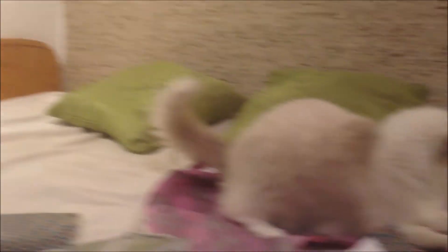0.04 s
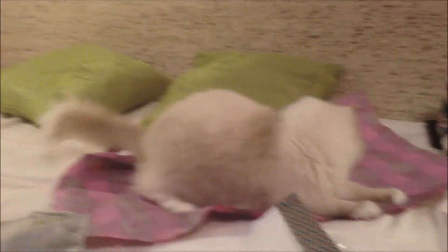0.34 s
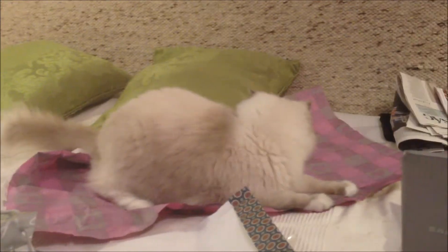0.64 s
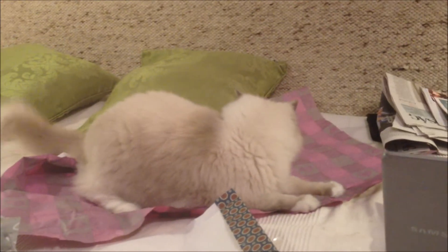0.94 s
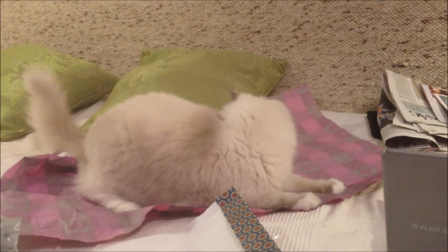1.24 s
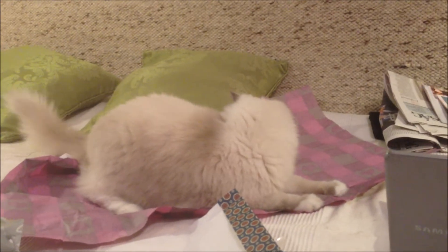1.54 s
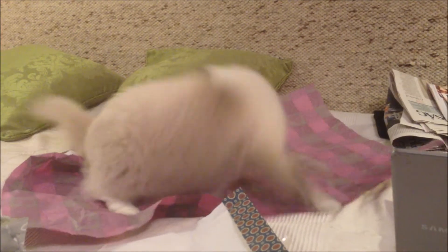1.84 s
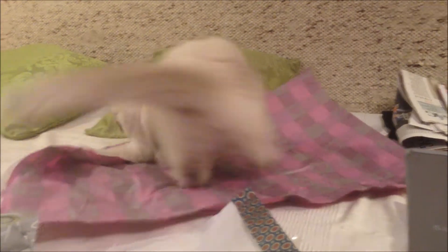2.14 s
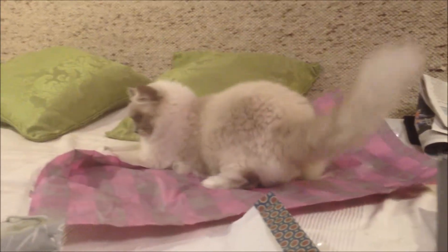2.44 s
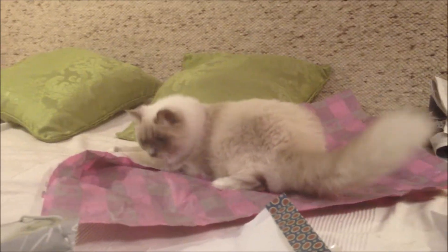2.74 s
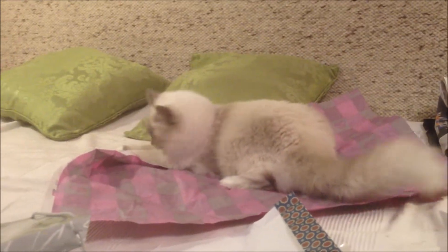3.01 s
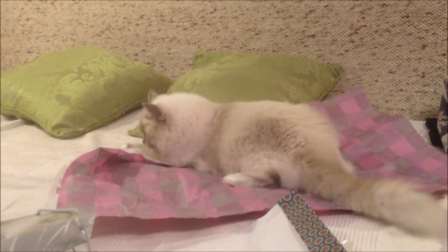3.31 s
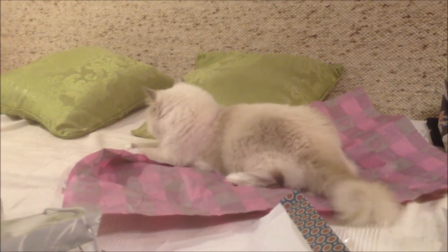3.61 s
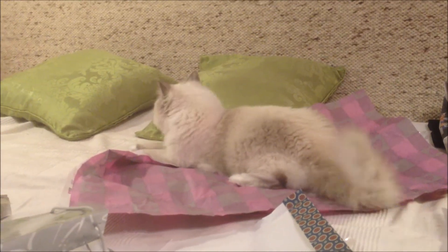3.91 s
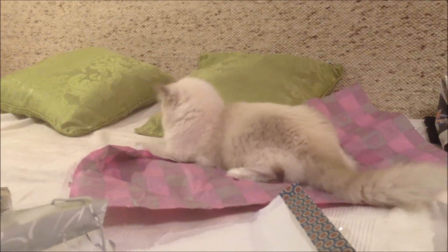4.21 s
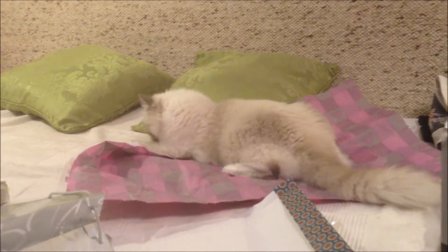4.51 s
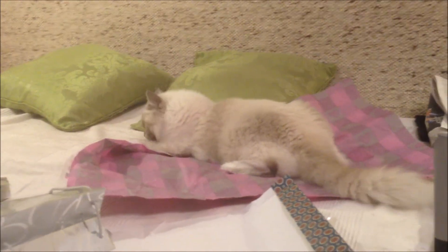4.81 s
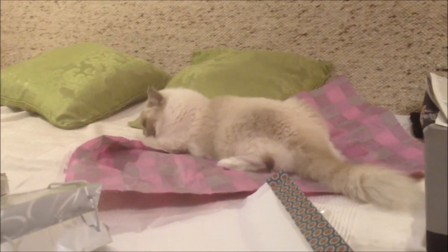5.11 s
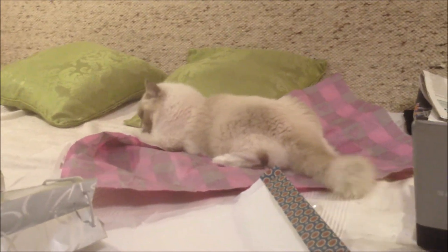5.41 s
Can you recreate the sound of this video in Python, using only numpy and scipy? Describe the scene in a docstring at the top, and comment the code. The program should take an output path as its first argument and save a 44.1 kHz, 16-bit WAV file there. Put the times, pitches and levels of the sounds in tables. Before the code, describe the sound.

A cat pounces and paws on crinkly wrapping paper on a bed, with one loud rustle among lighter crackles and sharp snaps.

```python
"""A small, quiet bedroom, one microphone close to a bed spread with a sheet of wrapping paper.
A cat shifts on the sheet, whirls round in a pounce, then paws at it. Creases buckle in swarms of tiny
clicks that ring small facets, single folds snap through, and the whole sheet flaps. A soft, breathy hiss
opens the scene and returns twice, fainter. A claw drags twice, a paw thuds once on the mattress, and
the near walls answer the paper."""
import sys
import numpy as np
from scipy import signal
from scipy.fft import rfft, irfft
from scipy.io import wavfile

SR = 44100
rng = np.random.default_rng(int(sys.argv[2]) if len(sys.argv) > 2 else 0)


def log_audio(samples):
    """Write samples as a 16-bit WAV file to the path given in sys.argv[1]."""
    # one column per channel
    frames = np.atleast_2d(samples).T
    # limit to full scale, then quantise
    limited = np.clip(frames, -1, 1)
    pcm = np.round(limited * 32767).astype(np.int16)
    wavfile.write(sys.argv[1], SR, pcm)


N = 244755
TIME = np.arange(N) / SR
ATTACK_S, RELAX_DB_PER_S = 0.0043, 182  # a push builds up, then the sheet relaxes
REFERENCE_DB = -47.5  # the push against which flapping and lesser folds are scaled

# the main folds snapping through:
# (time [s], crack level [dB], panel level [dB], crack pitch [Hz], panel pitch [Hz])
MAIN_FOLDS = [(0.1422, -43.5, -52, 12100, 4500), (0.173, -55, -45.5, 9000, 4030),
              (0.2264, -47, -47.5, 9000, 3980), (.3006, -51, -47, 9200, 900),
              (0.4262, -44, -48.5, 12300, 900), (0.4552, -36.5, -46.5, 10600, 4200),
              (0.636, -68, -54, 9000, 1200), (.812, -44.5, -52.5, 10000, 3780),
              (0.978, -53.5, -52.5, 8700, 900), (1.0587, -51.5, -55, 8800, 2620),
              (1.532, -55, -53.5, 9400, 890), (1.5425, -42.5, -53, 10100, 4240),
              (1.7353, -42, -40.5, 11000, 3500), (1.7437, -36, -37, 10000, 3900),
              (2.5044, -39, -60, 9900, 3900), (2.6467, -38, -47, 9100, 3800),
              (2.7132, -27.5, -38, 10700, 3560), (3.0401, -48, -49.5, 8000, 1800),
              (3.078, -43, -51, 11700, 5530), (3.2233, -39, -46, 11000, 4100),
              (3.3547, -55, -52.5, 7400, 4130), (3.4707, -47, -52, 10500, 4070),
              (3.5269, -39.5, -48, 10500, 4770), (3.8494, -59.5, -57.5, 10900, 4700),
              (3.954, -53, -44, 10000, 2630), (4.1629, -40, -50, 9700, 2520),
              (4.3688, -54.5, -53.5, 12500, 900), (4.4666, -50, -54.5, 9200, 4900),
              (4.4823, -50, -68, 7400, 4600), (4.714, -47.5, -59, 9200, 2070),
              (5.0516, -72, -48, 8500, 1890), (5.128, -43, -47, 11200, 4200),
              (5.1435, -42, -51, 9400, 5400), (5.2057, -36.5, -39, 11000, 3300)]


def undb(db):
    """Decibels to gain."""
    return 10 ** (np.asarray(db) / 20)


def unit(x):
    """Scale to an rms of one."""
    return x / np.sqrt(np.mean(x ** 2) + 1e-20)


def convolve(x, response):
    """Filter by an impulse response, keeping the length."""
    return signal.oaconvolve(x, response)[:len(x)]


def add(out, when, x):
    """Mix a short sound in at a time in seconds."""
    i = max(int(when * SR), 0)
    out[i:i + len(x)] += x[:max(len(out) - i, 0)]


def colour(points, size=2048):
    """Minimum-phase response of unit energy, shaped by (frequency [Hz], relative level [dB]) points."""
    hz, db = np.transpose(points)
    log_hz = np.log(np.fft.rfftfreq(size, 1 / SR) + 1)
    gain = undb(np.interp(log_hz, np.log(hz), db))
    cepstrum = irfft(np.log(gain))
    cepstrum[1:size // 2] *= 2
    cepstrum[size // 2 + 1:] = 0
    return unit(irfft(np.exp(rfft(cepstrum)))) / np.sqrt(size)


def resonate(x, hz, width_hz):
    """Two-pole resonance, gain one at its centre."""
    hz = min(hz, .45 * SR)
    return signal.lfilter(*signal.iirpeak(hz, hz / width_hz, fs=SR), x)


def swell(start, end, fall_db_per_s=RELAX_DB_PER_S, attack_s=ATTACK_S):
    """Envelope that rises, holds until the end and dies away."""
    return np.clip((TIME - start) / attack_s, 0, 1) * undb(-fall_db_per_s * np.maximum(TIME - end, 0))


def buckles(per_s, spread_db):
    """Random impulses of unit mean power: many small, a few large."""
    chance = np.minimum(per_s / SR, 1)
    sizes = unit(undb(spread_db * np.minimum(rng.exponential(size=N), 3.5)))
    return (rng.random(N) < chance) * rng.choice([-1, 1], N) * sizes / np.sqrt(chance)


def burst(envelope):
    """A click smeared over an envelope, as bending waves of different pitch travel at different speeds."""
    spectrum = rfft(rng.standard_normal(len(envelope)) * envelope)
    flat_noise = irfft(spectrum / np.abs(spectrum), len(envelope))
    return flat_noise * np.sqrt(envelope / envelope.max())


def room_tone(level_db=-65.5):
    """Steady low room noise under a faint hiss."""
    # spectrum of the still room: (frequency [Hz], relative level [dB])
    spectrum = [(25, -46), (60, -20), (110, -5.5), (170, -2), (230, 1.5), (330, -6), (580, -7.5),
                (850, -9.5), (2200, -11.5), (5000, -14), (10000, -20.5), (15500, -16)]
    return undb(level_db) * convolve(rng.standard_normal(N), colour(spectrum))


def bedroom(direct):
    """At the microphone: direct sound, two scattered echoes and a short tail that loses treble first."""
    # first echoes off the bed and the near walls: (delay [s], spread [s], level [dB])
    echoes = [(.005, 0.0033, -25), (.017, 0.0017, -20)]
    t = TIME[:SR // 2]
    response = np.zeros(len(t))
    for delay, spread, db in echoes:
        window = np.exp(-((t - delay - spread / 2) / (spread / 2)) ** 2 / 2)
        response += undb(db) * unit(rng.standard_normal(len(t)) * window)
    build_up = np.clip((t - .012) / 0.0064, 0, 1)
    for band, t60_s, db in (("low", 0.55, -5), ("high", .4, -9.5)):
        tail = unit(rng.standard_normal(len(t)) * build_up * undb(-60 * t / t60_s))
        response += undb(db) * signal.sosfilt(signal.butter(2, 5500, band, fs=SR, output="sos"), tail)
    return direct + convolve(direct, response / np.sqrt(len(t)))


def pawfall(when=2.768, level_db=-43.5, hz=225, length_s=0.014):
    """The mattress gives under a paw and springs back: a soft thud of about three swings."""
    out, t = np.zeros(N), TIME[:2048]
    press = np.sin(np.pi * np.minimum(t / length_s, 1)) ** 2
    add(out, when, undb(level_db) * press * np.sin(2 * np.pi * hz * t))
    return out


def hiss_strength(fade_db_per_s=31.5):
    """Envelope of the breathy hiss: each spell holds steady, fades and stops."""
    # spells of hiss: (start [s], fades [s], stops [s], strength [dB])
    spells = [(0, 0.454, 0.726, -54.5), (3.974, 4.25, 4.4, -63), (5.024, 5.28, 5.38, -66)]
    return sum(undb(db - fade_db_per_s * np.maximum(TIME - fades, 0))
               * swell(start, stops, fall_db_per_s=260) for start, fades, stops, db in spells)


def breathy_hiss(strength):
    """A soft, breathy, fine-grained hiss with hollow, vowel-like resonances."""
    # spectrum of the hiss: (frequency [Hz], relative level [dB])
    spectrum = [(80, -16), (200, 3.5), (700, 0), (3200, -4.5), (5600, -3), (8000, -2), (13000, -3),
                (15500, -10.5)]
    # vowel-like resonances: (frequency [Hz], width [Hz], gain [dB])
    peaks = [(274, 87, 4.7), (440, 55, 6.8), (1243, 94, 8.1), (4000, 270, 1.4), (4670, 380, 2.4)]
    grain = buckles(per_s=6000, spread_db=1)
    ring = sum(undb(db) * resonate(rng.standard_normal(N), hz, width) for hz, width, db in peaks)
    return convolve(strength * (grain + ring), colour(spectrum))


def claw_scratches(hz=4000, width_hz=630):
    """A claw catches and slips in quick succession, ringing one stiff panel."""
    # drags of the claw: (start [s], length [s], level [dB])
    drags = [(1.744, 0.02, -44.5), (3.313, 0.066, -63.5)]
    strength = sum(undb(db) * swell(start, start + length) for start, length, db in drags)
    catches = buckles(per_s=390, spread_db=0.5)
    return strength * unit(resonate(resonate(catches, hz, width_hz), hz, width_hz))


def push_strength():
    """Envelope of the single paw pushes, added in power."""
    # paws pressing on the sheet: (start [s], length [s], strength [dB])
    pushes = [(0, 0.01, -44.5), (0.38, 0.046, -53.5), (2.419, 0.055, -47), (2.502, 0.094, -47.5),
              (2.645, 0.043, -50), (2.715, 0.018, -43), (3.074, 0.038, -49.5), (3.157, 0.018, -55),
              (3.213, 0.04, -50), (3.335, 0.089, -60), (3.532, 0.02, -53), (3.858, 0.046, -63),
              (3.969, 0.16, -57), (4.155, 0.07, -48.5), (4.376, 0.033, -58.5), (4.468, .04, -57),
              (4.57, 0.12, -64.5), (4.713, 0.054, -60), (4.806, 0.27, -70), (5.129, 0.067, -49),
              (5.21, 0.032, -37.5), (5.322, 0.091, -61.5), (5.489, 0.032, -59)]
    return np.sqrt(sum((undb(db) * swell(start, start + length)) ** 2 for start, length, db in pushes))


def pounce_strength():
    """Envelopes of crackle and flapping through the pounce: they start at once and relax afterwards."""
    # one unbroken whirl on the sheet: (time [s], relative crackle level [dB], relative flap level [dB])
    whirl = [(1.745, -31.5, -42.5), (1.773, -32, -43), (1.791, -37.5, -50.5), (1.805, -37, -44),
             (1.849, -32.5, -44.5), (1.895, -36, -50), (1.961, -28, -44.5), (1.989, -34.5, -51),
             (1.999, -30, -44), (2.057, -26.5, -46), (2.165, -36.5, -53.5), (2.173, -29.5, -47.5),
             (2.187, -25, -46), (2.237, -32, -53.5), (2.311, -38.5, -51.5), (2.38, -45.5, -57)]
    times, crackle_db, flap_db = np.transpose(whirl)
    gate = swell(times[0] - .004, times[-1], attack_s=0.0044)
    crackling = gate * undb(np.interp(TIME, times, crackle_db) - 1.88)
    flapping = gate * undb(np.interp(TIME, times, flap_db) - 1)
    return crackling, flapping


def settling_strength(relative_db=-20):
    """Envelope of the creases that go on settling after each main fold's crack."""
    return sum(undb(crack_db + relative_db) * swell(when, when, fall_db_per_s=156)
               for when, crack_db, *_ in MAIN_FOLDS)


def flap(strength):
    """Broad panels of the sheet pop over and push air: the low body of the rustle."""
    # spectrum of the flapping: (frequency [Hz], relative level [dB])
    spectrum = [(60, -27), (110, -14.5), (170, 0.5), (280, 2), (550, 2.5), (850, -1), (1300, -2.5),
                (2400, -7.5), (4200, -29), (7000, -33)]
    per_s = 600 * (strength / undb(-59)) ** .5 + 100
    return convolve(strength * buckles(per_s, spread_db=1), colour(spectrum))


def crackle(strength, facet_count=512, ring_s=0.00066):
    """Creases buckle faster and brighter the harder the paper is worked; each rings one small facet."""
    # spectrum of the crackle: (frequency [Hz], relative level [dB])
    spectrum = [(530, -51), (900, -10), (1430, -9), (1690, -9.5), (1930, -5.5), (3030, -5), (3850, -3),
                (5000, -2.5), (5500, -5.5), (5980, -2), (8050, 1.5), (10200, 0.5), (12400, 2.5), (14300, 0),
                (15500, -4.5)]
    clicks = buckles(per_s=900 * (strength / undb(-49)) ** .5 + 80, spread_db=3)
    struck = rng.integers(facet_count, size=N)
    t = TIME[:160]
    rings = unit(rng.standard_normal((facet_count, len(t))) * np.exp(-t / ring_s)) / np.sqrt(len(t))
    onsets = np.flatnonzero(clicks)
    places = onsets[:, None] + np.arange(len(t))
    grains = clicks[onsets, None] * rings[struck[onsets]]
    facets = np.bincount(places.ravel(), grains.ravel(), N)[:N]
    rub = rng.standard_normal(N)  # fur and bedding slide along the sheet
    crisp = convolve(strength * (facets + rub), colour(spectrum))
    # gentle bending is duller and brings out the sheet's own resonance
    dull = signal.lfilter(*signal.butter(1, 8000, fs=SR), crisp)
    soft = dull + undb(-4.5) * resonate(crisp, hz=4170, width_hz=1730)
    crisp_share = strength / (strength + undb(-48))
    return crisp_share * crisp + (1 - crisp_share) * soft


def lesser_folds(strength, per_s=30, spread_db=3.5):
    """Rows like MAIN_FOLDS for folds that give way at random, louder as the strength rises."""
    folds = []
    draws = rng.uniform(-1, 1, (int(N / SR * per_s), 5))
    for slot, (jitter, size, ring, sharpness, pitch) in enumerate(draws):
        when = (slot + (jitter + 1) / 2) / per_s
        strength_db = 20 * np.log10(strength[int(when * SR)] + 1e-9) - REFERENCE_DB
        gain_db = 0.88 * strength_db + spread_db * size
        crack_db, panel_db = gain_db - 48.5, gain_db - 55.5 + spread_db * ring
        crack_hz, panel_hz = 10800 * 2 ** (0.24 * sharpness), 3360 * 2 ** (.7 * pitch)
        folds.append((when, crack_db, panel_db, crack_hz, panel_hz))
    return folds


def snaps(folds):
    """A fold runs through in a millisecond or two: a bright crack over a panel's longer, duller ring."""
    # broad resonances common to all panels between creases: (frequency [Hz], width [Hz], gain [dB])
    panel_modes = [(650, 750, 1.5), (2180, 1400, 2.5), (3730, 790, -7.5)]
    out, t = np.zeros(N), TIME[:1400]
    scale = np.sqrt(.003 * SR / len(t))  # a snap's level is its energy spread over 3 ms
    for when, crack_db, panel_db, crack_hz, panel_hz in folds:
        jolt = burst(t * np.exp(-t / 0.00098))
        push = burst((1 - np.exp(-t / 0.0004)) * np.exp(-t / 0.0081))
        fold = resonate(jolt, 8000, 2000) - undb(0.5) * resonate(jolt, 13200, 2300)
        crack = resonate(fold, crack_hz, width_hz=8200)
        common = sum(undb(db) * resonate(push, hz, width) for hz, width, db in panel_modes)
        own = undb(4.5) * resonate(push, panel_hz, 0.16 * panel_hz)  # a panel's size sets its pitch
        panel = signal.sosfilt(signal.butter(2, 5500, fs=SR, output="sos"), common + own)
        add(out, when, scale * (undb(crack_db) * unit(crack) + undb(panel_db) * unit(panel)))
    return out


def scene():
    """In mono from the bedside: the paper rings out into the room; the thud stays dry in the bedding."""
    pushes, hissing = push_strength(), hiss_strength()
    pounce_crackle, pounce_flap = pounce_strength()
    work = np.hypot(pushes, pounce_crackle)
    push_flap = undb(-63.5) * (pushes / undb(REFERENCE_DB)) ** .7  # grows more slowly than crackle
    direct = crackle(np.hypot(work, settling_strength()))
    direct += flap(np.hypot(push_flap, pounce_flap))
    direct += breathy_hiss(hissing) + claw_scratches()
    direct += snaps(MAIN_FOLDS) + snaps(lesser_folds(np.hypot(work, hissing)))
    return (bedroom(direct) + pawfall() + room_tone())[None]


def record(dry):
    """The recorder cuts the top steeply above 15.4 kHz."""
    return signal.sosfilt(signal.ellip(10, .2, 70, 15400, fs=SR, output="sos"), dry)


dry = scene()
out = record(dry)
log_audio(out)
```